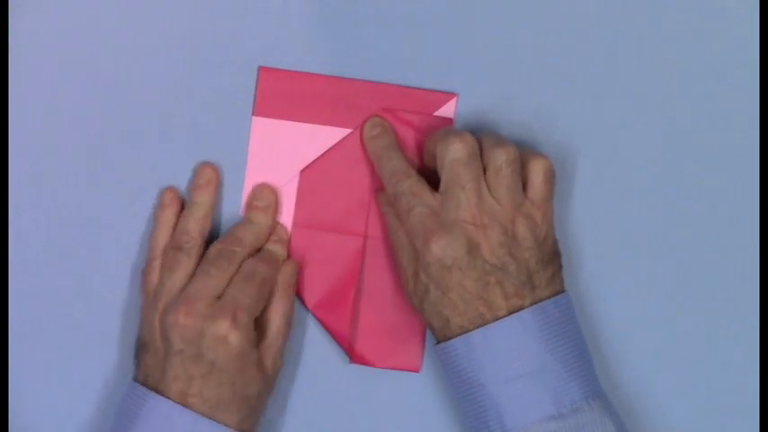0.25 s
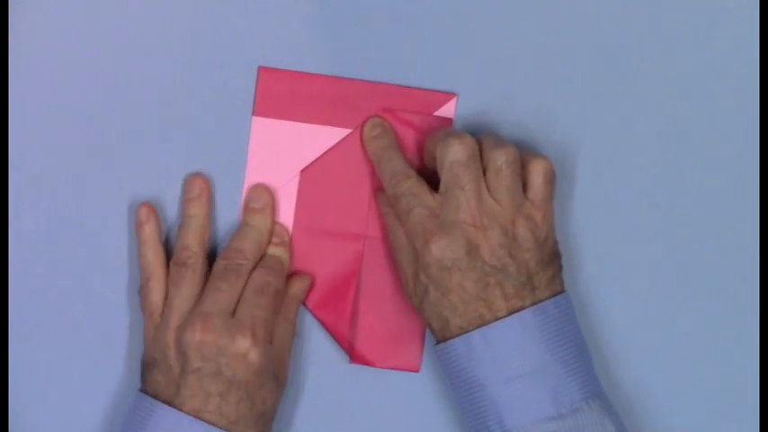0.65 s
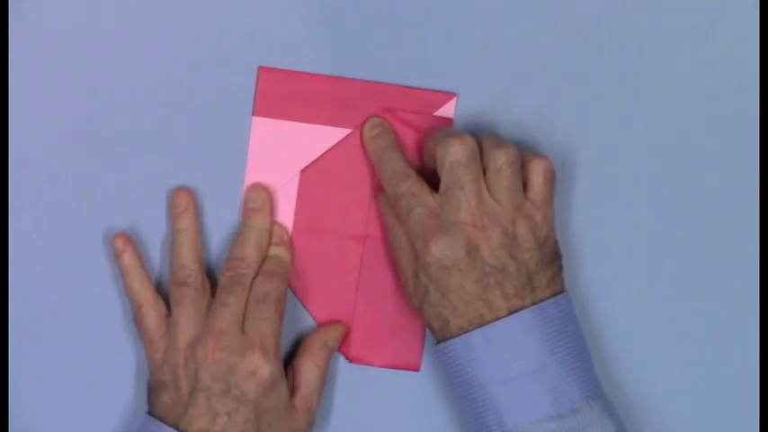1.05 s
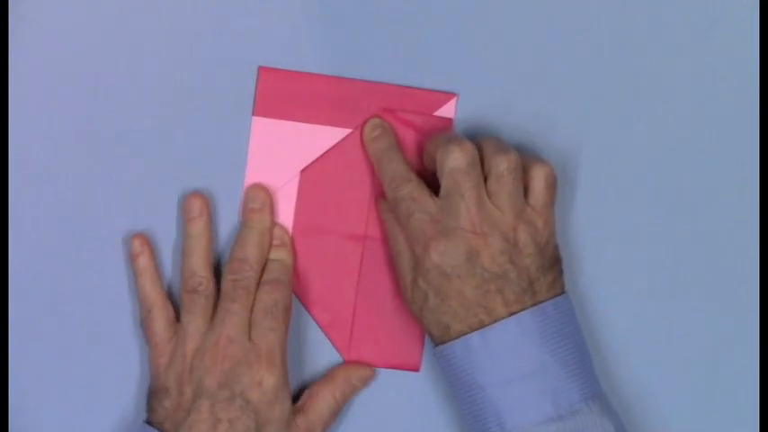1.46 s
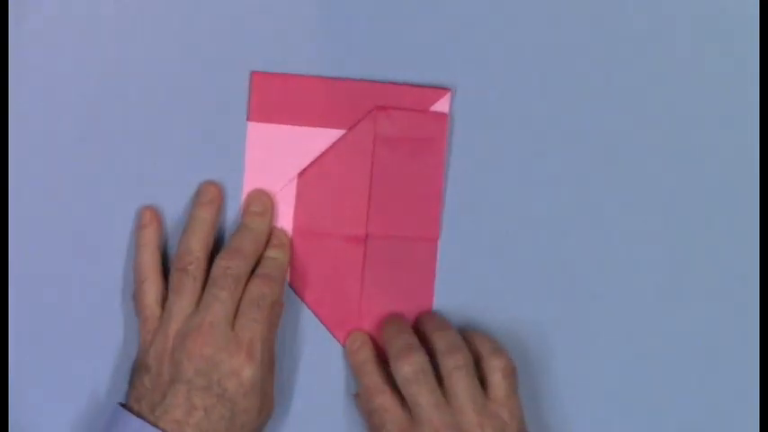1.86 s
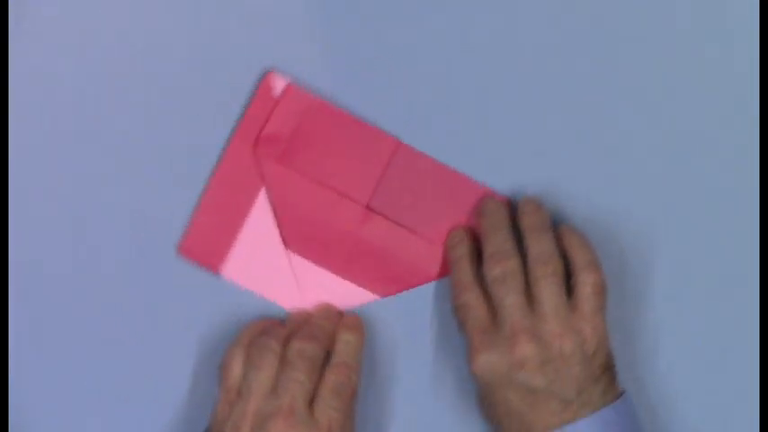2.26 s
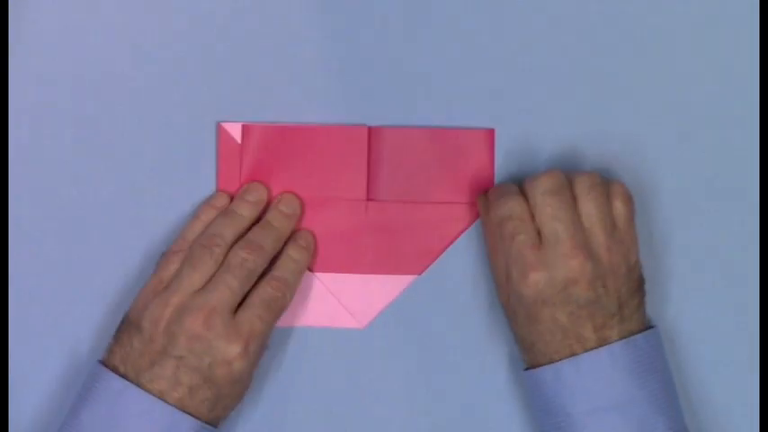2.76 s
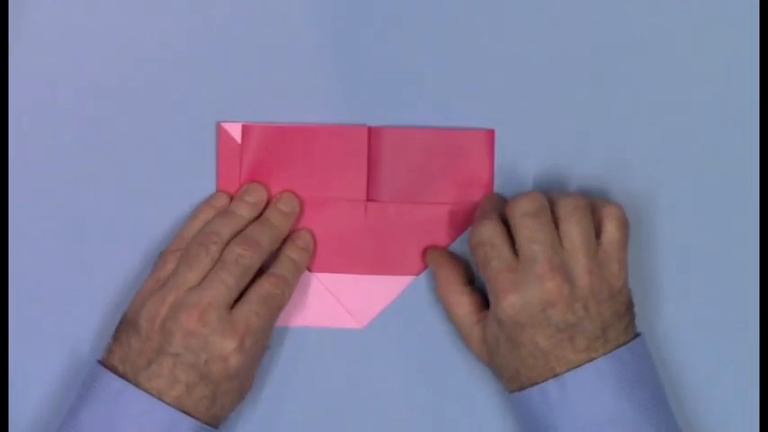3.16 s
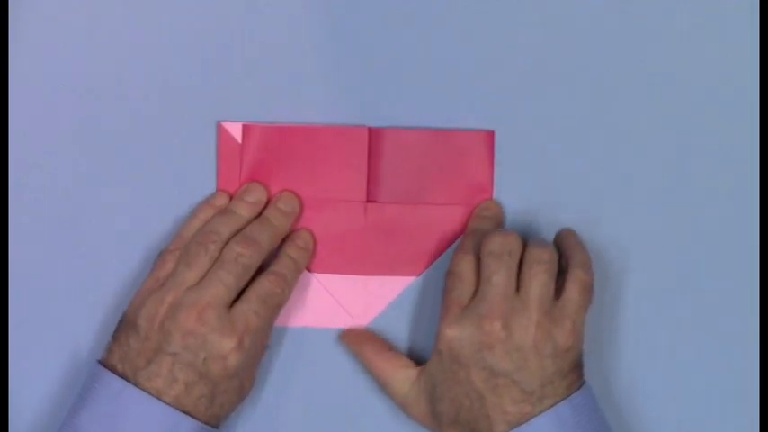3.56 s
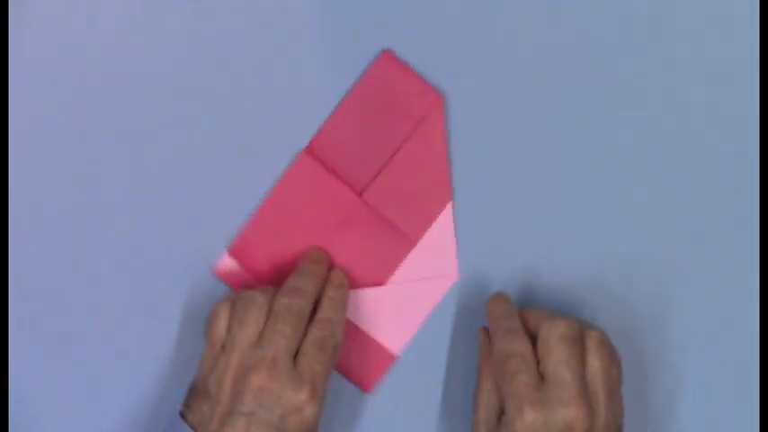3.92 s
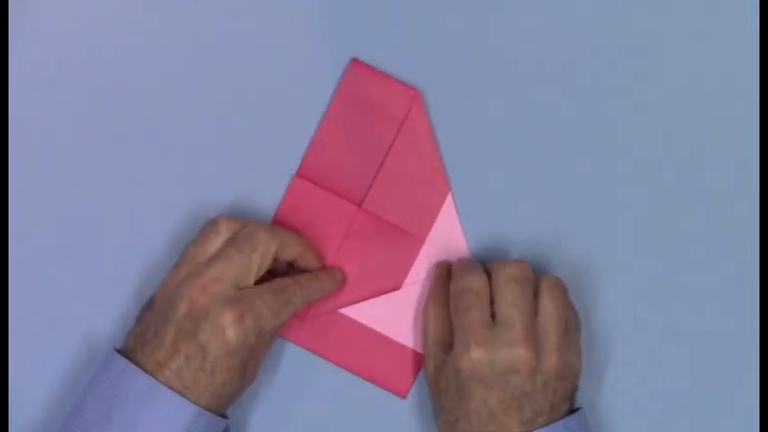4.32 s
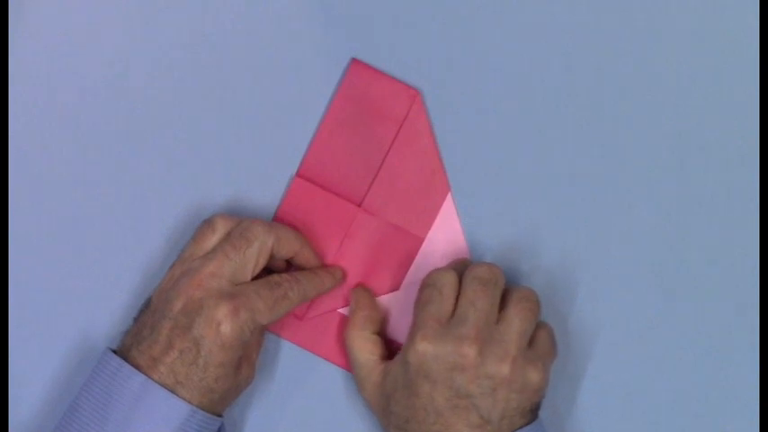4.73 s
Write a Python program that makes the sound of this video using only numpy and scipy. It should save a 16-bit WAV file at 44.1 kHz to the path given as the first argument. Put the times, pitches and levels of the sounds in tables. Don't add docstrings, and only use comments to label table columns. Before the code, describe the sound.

Paper folding heard close in a quiet indoor room with faint low ventilation hum. Gentle fingertip rubbing and light crinkles grow into a long papery swish, then bright crease snaps and a short ringing nail drag. Later come rubs with a thin whistling edge, loud snaps with soft table taps, a second big swish, and small crackles to the end. Sound sits on the left; the right carries only faint hiss and a trace of bass.

```python
import sys
import numpy as np
from scipy import signal
from scipy.fft import rfft, irfft, next_fast_len
from scipy.io import wavfile

SR = 44100
rng = np.random.default_rng(int(sys.argv[2]) if len(sys.argv) > 2 else 0)


def makeup_ratio(level_db):
    decades = np.asarray(level_db, float) / 20
    return 10 ** decades


def put_to_file(sound):
    columns = np.atleast_2d(sound).T
    safe = np.clip(columns, -1, 1)
    whole_steps = np.round(safe * 32767)
    wavfile.write(sys.argv[1], SR, whole_steps.astype(np.int16))


N = 219970

# hardest at in seconds, building time in seconds,
# easing time in seconds, pocket level in dB, whistle in dB re pocket.
PRESSES = [(0.0, .05, 0.45, -55, -30), (.28, .12, .13, -47, -30), (.62, 0.062, 0.064, -54.5, -27),
           (.70, 0.048, 0.36, -53.5, -30), (1.08, 0.059, 0.037, -53.5, -30), (1.57, 0.087, .1, -48.5, -30),
           (1.96, 0.23, 0.16, -50, -30), (2.21, 0.17, .15, -45.5, -30), (2.45, 0.16, .2, -51, -33),
           (3.15, .14, 0.066, -47, -10), (3.29, 0.072, 0.19, -46, -3), (3.445, 0.06, 0.038, -58, 8.5),
           (3.52, 0.075, 0.036, -54, -1), (3.86, 0.039, 0.12, -48, -28), (4.0, 0.031, 0.084, -42, -30),
           (4.14, .05, 0.17, -57, -30), (4.535, 0.027, .04, -51, -7), (4.6, .03, 0.021, -47, -18),
           (4.64, 0.02, 0.041, -43.5, -18), (4.724, 0.035, 0.038, -53, 3)]
# fastest at in seconds, speeding-up time in seconds,
# slowing time in seconds, hiss level in dB, dryness as top end in dB re hiss.
BRUSHES = [(0.0, .05, 0.074, -44.5, -38), (.62, 0.044, 0.044, -50.5, -17), (.70, 0.03, 0.065, -48, -14),
           (.84, .06, 0.071, -47.5, -10), (.93, 0.084, 0.067, -43, -3.5), (1.08, 0.065, .05, -51, -5),
           (1.23, .05, 0.071, -57, -5), (1.35, 0.064, 0.03, -46, -4), (1.57, 0.074, 0.053, -47.5, -3),
           (2.02, 0.086, 0.035, -38, -6), (2.6, 0.1, 0.23, -49, -20), (2.73, 0.035, 0.038, -41.5, -23),
           (3.14, 0.12, 0.11, -48.5, -4), (3.3, 0.11, 0.065, -48.5, -1.5), (3.39, 0.056, 0.11, -44, -7.5),
           (3.54, 0.05, 0.055, -45, -5.5), (3.63, 0.063, 0.079, -46, -3), (4.16, .06, 0.14, -46, -4.5),
           (4.41, 0.075, 0.071, -49, -14), (4.53, 0.043, 0.067, -44.5, -11), (4.61, .03, 0.15, -45.5, -16),
           (4.75, 0.12, 0.095, -42.5, -15), (4.81, 0.065, .1, -44, -5), (4.97, 0.13, .08, -51, -3)]
# fastest at in seconds,
# speeding-up time in seconds, slowing time in seconds, hiss level in dB, dryness in dB re hiss.
TURNS = [
    (1.65, 0.11, 0.23, -43.5, -4),
    (1.97, 0.089, 0.1, -41, -6.5),
    (2.28, 0.19, 0.19, -33, -4),
    (3.92, 0.16, 0.16, -35, -3.5),
]


def rms_one(x):
    return x / np.sqrt(np.mean(x ** 2) + 1e-20)


def peak_one(x):
    return x / np.max(np.abs(x))


def coloured(spectrum):
    hz, level_db = np.transpose(spectrum)
    bins_hz = np.fft.rfftfreq(N, 1 / SR) + 1
    density_db = np.interp(np.log(bins_hz), np.log(hz), level_db)
    gain = makeup_ratio(density_db) * np.sqrt(SR / 2)
    return irfft(rfft(rng.standard_normal(N)) * gain, N)


def drift(rate_hz):
    r = np.exp(-80 * np.pi * rate_hz / SR)
    noise = rng.standard_normal(N // 40 + 2002)
    slow = signal.lfilter([1], [1, -2 * r, r * r], noise)[2000:]
    return np.interp(np.arange(N) / 40, np.arange(len(slow)), rms_one(slow))


def resonance(x, hz, width_hz):
    r = np.exp(-np.pi * width_hz / SR)
    zeros = np.array([1, 0, -1]) * (1 - r * r) / 2
    poles = [1, -2 * r * np.cos(2 * np.pi * hz / SR), r * r]
    return signal.lfilter(zeros, poles, x)


def moving_resonance(x, hz, width_hz):
    r = np.exp(-np.pi * width_hz / SR)
    out, state = np.zeros(N), np.zeros(2)
    for i in range(0, N, 256):
        poles = [1, -2 * r * np.cos(2 * np.pi * hz[i] / SR), r * r]
        out[i:i + 256], state = signal.lfilter([1, 0, -1], poles, x[i:i + 256], zi=state)
    return out


def band(x, low_hz, high_hz):
    edges_hz = [low_hz, min(high_hz, SR / 2.2)]
    return signal.sosfilt(signal.butter(2, edges_hz, "band", fs=SR, output="sos"), x)


def through(modes, x):
    total = 0
    for k, (hz, width_hz, db) in enumerate(modes):
        total = total + (-1) ** k * makeup_ratio(db) * resonance(x, hz, width_hz)
    return rms_one(total)


def grains(per_s, spread_db, clump_db):
    born = rng.random(N) < per_s / SR
    size_db = spread_db * np.minimum(rng.exponential(1, N), 4)
    sizes = makeup_ratio(size_db) * rng.choice([-1, 1], N)
    return born * sizes * makeup_ratio(clump_db * drift(21.0)) + 1e-9


def strokes(rows, extra_db=0, squareness=1.41):
    edge_db = 12.5
    t, power = np.arange(0, N, 64) / SR, 1e-12
    extras_db = np.broadcast_to(extra_db, len(rows))
    for (s, rise_s, fall_s, db), extra in zip(np.array(rows)[:, :4], extras_db):
        away = np.where(t < s, (s - t) / rise_s, (t - s) / fall_s)
        power = power + makeup_ratio(db + extra - edge_db * away ** squareness) ** 2
    return np.interp(np.arange(N) / SR, t, np.sqrt(power))


def sliding(dryness=0):
    brush = strokes(BRUSHES, dryness * np.array(BRUSHES)[:, 4])
    turn = strokes(TURNS, dryness * np.array(TURNS)[:, 4], squareness=2.78)
    return np.hypot(brush, turn)


def add(out, s, sound):
    i = round(s * SR)
    out[i:i + len(sound)] += sound[:N - i]


def ventilation():
    # frequency in Hz, level in dB rms.
    orders = [
        (91.5, -49),
        (183.0, -58.5),
        (274.5, -74),
    ]
    # time in seconds, level in dB re its mean.
    third_order = [(0, -11), (1, -3), (1.5, -17), (3.5, 3), (3.8, 4), (4.99, 12)]
    # frequency in Hz, width in Hz, level in dB rms.
    room_modes = [(32, 11.7, -43), (55.05, 4.4, -46), (72.65, 4.8, -47.5), (122.5, 5.9, -67),
                  (214.8, 4.1, -66.5)]
    # frequency in Hz, density in dB per Hz.
    air = [(20, -58.5), (100, -68), (160, -76), (300, -81.5), (700, -90.5), (2000, -116.5)]
    t = np.arange(N) / SR
    wander_s = np.cumsum(0.0026 * drift(0.99)) / SR
    swells_db = [0, 0, np.interp(t, *np.transpose(third_order))]
    hum = 0
    for (hz, db), swell_db in zip(orders, swells_db):
        gain = makeup_ratio(db + swell_db + 9.5 + 1.0 * drift(4.1))
        hum = hum + gain * np.sin(2 * np.pi * (hz * (t + wander_s) + rng.random()))
    rumble = 0
    for hz, width_hz, db in room_modes:
        mode = resonance(resonance(rng.standard_normal(N), hz, width_hz), hz, 3 * width_hz)
        rumble = rumble + makeup_ratio(db + 4.5) * rms_one(mode)
    return hum + rumble + coloured(air)


def thuds():
    # start in seconds, peak in dB, pitch in Hz.
    landings = [(1.315, -48, 300), (1.343, -53, 352), (2.685, -50.5, 540), (3.603, -48.5, 493),
                (3.612, -47, 394), (3.627, -54, 346), (4.63, -59, 444)]
    out, t = np.zeros(N), np.arange(6000) / SR
    for s, peak_db, hz in landings:
        noise = rng.standard_normal(len(t))
        push = noise * (1 - np.exp(-t / 0.00027)) * np.exp(-t / 0.03)
        knock = resonance(resonance(push, hz, 160), hz, 340)
        add(out, s, makeup_ratio(peak_db + 9.0) * peak_one(knock))
    return out


def creasing():
    # time in seconds, level in dB, upper modes in dB re lower.
    drag = [(2.521, -66, -5), (2.525, -38.5, 0.5), (2.545, -35, -8), (2.565, -41, 3.5), (2.598, -44, 3.5),
            (2.61, -41.5, -6), (2.625, -45, 0), (2.655, -61, 6), (2.67, -58, -5)]
    # frequency in Hz, width in Hz, level in dB.
    fold_modes = [(1760, 130, -6.5), (1950, 50, -3.5), (2200, 23, 5.5), (2420, 120, -2), (2750, 120, 0),
                  (3180, 370, -3), (4380, 520, -19)]
    s, level_db, upper_db = np.transpose(drag)
    t = np.arange(N) / SR
    slips = grains(3500, spread_db=0.5, clump_db=1.3)
    lower, upper = through(fold_modes[:3], slips), through(fold_modes[3:], slips)
    mix = lower + upper * makeup_ratio(np.interp(t, s, upper_db))
    return makeup_ratio(np.interp(t, s, level_db + 0.5, left=-200, right=-200)) * mix


def ticks():
    # start in seconds, peak in dB, pitch in Hz.
    breaks = [(1.059, -36, 7700), (1.195, -45.5, 5230), (1.387, -54, 4700), (1.552, -41, 5000),
              (1.563, -43, 9500), (2.4017, -64, 4600), (2.6769, -39.5, 5100), (3.4401, -39, 6460),
              (3.6001, -42, 5200), (3.6102, -58, 8000), (4.134, -45, 4840), (4.333, -48, 8000),
              (4.597, -43.5, 5500), (4.6274, -54, 5000)]
    out, t = np.zeros(N), np.arange(1000) / SR
    for s, peak_db, hz in breaks:
        fray = rng.standard_normal(len(t)) * np.exp(-t / 0.0028)
        kick = (t == 0) + 0.12 * fray
        edge = band(resonance(kick, hz, 0.3 * hz), 2400, 12700)
        add(out, s + 0.00109, makeup_ratio(peak_db + 15.5) * peak_one(edge))
    return out


def snaps():
    # start in seconds, ring peak in dB, low body in dB, ring pitch in Hz.
    creases = [(.488, -40, -55, 2000), (1.059, -34.5, -42, 1550), (1.195, -38, -49, 1800),
               (1.23, -40, -39.5, 2040), (1.315, -42, -63, 1760), (1.388, -38, -61, 1890),
               (1.552, -26.5, -58, 3700), (1.563, -36, -36.5, 2400), (1.817, -33, -40, 1700),
               (2.125, -39, -38.5, 1600), (2.4012, -23, -52, 2670), (2.673, -27, -53, 2200),
               (2.6767, -29, -41, 2940), (3.4401, -20, -49, 3200), (3.45, -36, -64, 3400),
               (3.6004, -21.5, -33, 3400), (3.6099, -39, -39, 3600), (4.134, -38, -61, 3030),
               (4.224, -39, -41, 2500), (4.2286, -39, -54, 2400), (4.334, -43, -64, 3480),
               (4.597, -36, -47, 3400), (4.6273, -21.5, -46, 2200), (4.873, -36.5, -41.5, 2920),
               (0.337, -36, -62, 2600)]
    out, t = np.zeros(N), np.arange(3000) / SR
    for s, ring_db, body_db, ring_hz in creases:
        noise = rng.standard_normal(len(t))
        kick = (t == 0) + 0.12 * noise * np.exp(-t / 0.0021)
        slack = (t == 0) + 0.1 * noise * np.exp(-t / 0.0082)
        ring = resonance(resonance(kick, ring_hz, 0.4 * ring_hz), ring_hz, 1.4 * ring_hz)
        add(out, s + 0.001128, makeup_ratio(ring_db + 5.5) * peak_one(ring))
        add(out, s + 0.001706, makeup_ratio(body_db + 5) * peak_one(band(slack, 810, 1850)))
    return out


def fold_whistle():
    whistle_hz = 3110
    rub = grains(3400, spread_db=3.0, clump_db=5.5)
    whistle = rms_one(resonance(resonance(rub, whistle_hz, 200), whistle_hz, 600))
    return strokes(PRESSES, np.array(PRESSES)[:, 4]) * whistle


def flexing_sheet():
    # most at in seconds, building time in seconds,
    # easing time in seconds, flex level in dB.
    bends = [(.0, .05, 0.54, -54.5), (.28, .12, .12, -52.5), (.7, 0.16, 0.22, -58),
             (1.08, 0.23, .06, -52.5), (1.21, 0.033, 0.066, -56), (1.35, 0.065, .06, -48),
             (1.57, 0.073, 0.47, -48), (1.81, .15, .1, -49), (2.13, 0.08, 0.19, -46.5),
             (2.4, 0.15, 0.094, -45.5), (2.69, 0.27, 0.063, -45), (3.2, 0.29, 0.17, -56),
             (3.43, 0.21, 0.19, -51), (3.62, 0.034, 0.11, -48.5), (3.78, 0.067, 0.074, -47.5),
             (4.2, 0.15, 0.1, -48), (4.45, 0.44, 0.35, -53.5), (4.7, .1, .3, -68), (4.95, 0.22, 0.15, -54)]
    # frequency in Hz, width in Hz, level in dB.
    sheet_modes = [(1100, 780, -3), (1770, 506, 2), (2300, 1510, -3.5)]
    gain = np.hypot(strokes(bends), makeup_ratio(-12.5) * sliding())
    return gain * through(sheet_modes, grains(5000, spread_db=2.0, clump_db=1.07))


def fold_pocket():
    # frequency in Hz, width in Hz, level in dB.
    air_modes = [(3120, 410, -0.5), (3700, 1900, 2.5), (2600, 2150, 2.5)]
    gain = np.hypot(strokes(PRESSES), makeup_ratio(-19.5) * sliding())
    return gain * through(air_modes, grains(7000, spread_db=2.5, clump_db=2.15))


def surface_hiss():
    # time in seconds, resonance in Hz.
    gap = [(0, 5400), (.7, 6800), (.93, 8000), (1.348, 6900), (1.7, 5600), (2.0, 8000), (2.2, 6000),
           (2.38, 7500), (2.73, 5700), (3.14, 9000), (3.28, 7100), (3.4, 6300), (3.54, 7100), (3.86, 8600),
           (4.0, 6400), (4.6, 5500), (4.75, 6000), (4.99, 7000)]
    gap_hz = np.interp(np.arange(N) / SR, *np.transpose(gap))
    slide = rms_one(band(grains(9000, spread_db=1.5, clump_db=1.4), 3100, 7630))
    sheen = rms_one(moving_resonance(grains(9000, spread_db=3.0, clump_db=3.5), gap_hz, 1600))
    top = rms_one(band(grains(15000, spread_db=3.0, clump_db=1.6), 7040, 12600))
    gain = np.hypot(sliding(), makeup_ratio(-8.5) * strokes(PRESSES))
    return gain * (0.85 * slide + 0.42 * sheen) + sliding(dryness=1) * top


def rubbing():
    return makeup_ratio(-1.0) * (surface_hiss() + fold_pocket() + flexing_sheet()) + makeup_ratio(1.5) * fold_whistle()


def room(x):
    t60_s, wall_cut_hz = 0.42, 9200
    size = next_fast_len(N + SR)
    hz = np.fft.rfftfreq(size, 1 / SR)

    def delay(s):
        return np.exp(-2j * np.pi * hz * s)

    wet = 0
    for k, lag_s in enumerate(rng.uniform(0.009, 0.035, 8)):
        loop = makeup_ratio(-60 * lag_s / t60_s) * delay(lag_s) / (1 + 1j * hz / wall_cut_hz)
        wet = wet + (-1) ** k * loop / (1 - loop)
    response = 1 + makeup_ratio(-14) * delay(0.0048) + makeup_ratio(-22.5) * wet
    return irfft(rfft(x, size) * response, size)[:N]


def scene():
    paper = rubbing() + creasing() + snaps() + ticks() + thuds()
    return np.array([room(paper) + ventilation(), np.zeros(N)])


def low_pass(x):
    return signal.sosfilt(signal.butter(12, 15720, fs=SR, output="sos"), x)


def record(dry):
    # frequency in Hz, density in dB per Hz.
    input_hiss = [(20, -90), (60, -92.5), (150, -94), (1500, -97.5), (5000, -98.5), (10000, -101),
                  (14000, -105), (16000, -110)]
    leak_hz, leak_db, left_hiss_db = 43, -18, 4
    r = np.exp(-2 * np.pi * leak_hz / SR)
    leak = -makeup_ratio(leak_db) * signal.lfilter([1 - r], [1, -r], dry[0])
    left = dry[0] + makeup_ratio(left_hiss_db) * coloured(input_hiss)
    right = leak + coloured(input_hiss)
    roll_off = signal.butter(10, 14570, fs=SR, output="sos")
    return low_pass(signal.sosfilt(roll_off, np.array([left, right])))


dry = scene()
out = record(dry)
put_to_file(out)
```